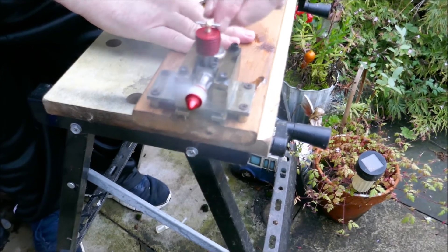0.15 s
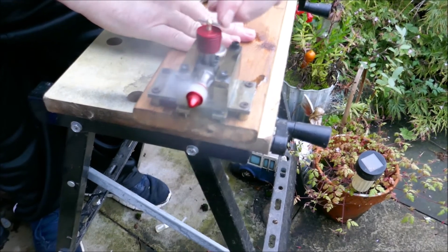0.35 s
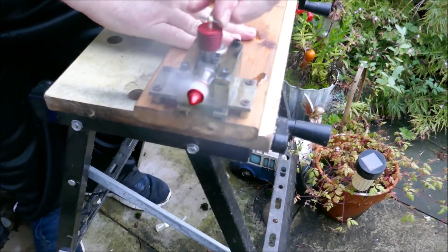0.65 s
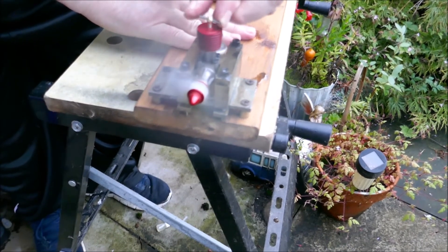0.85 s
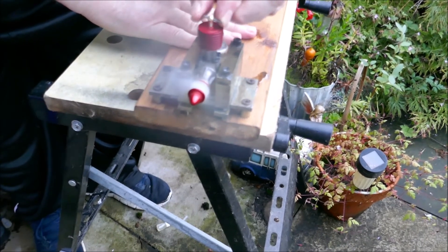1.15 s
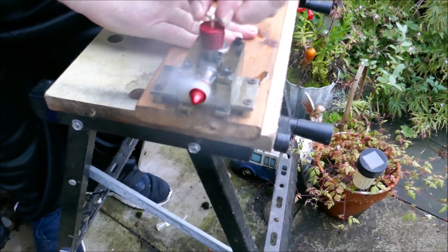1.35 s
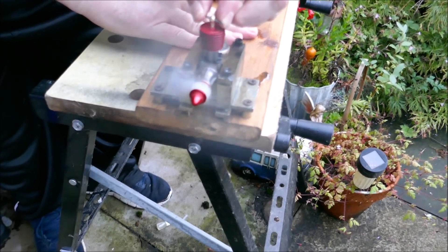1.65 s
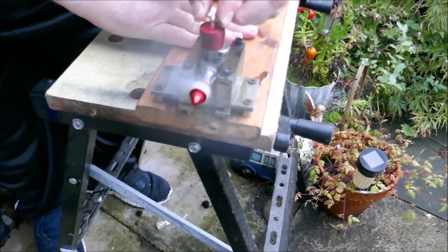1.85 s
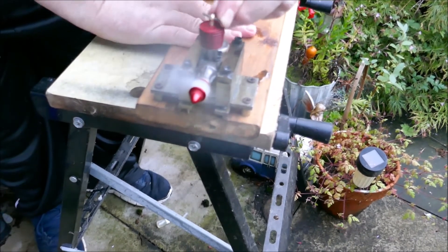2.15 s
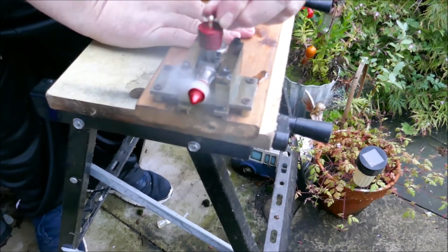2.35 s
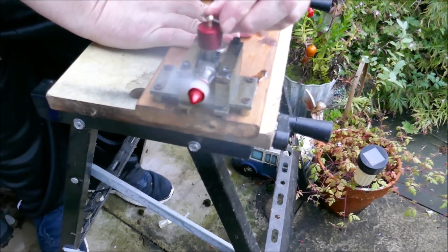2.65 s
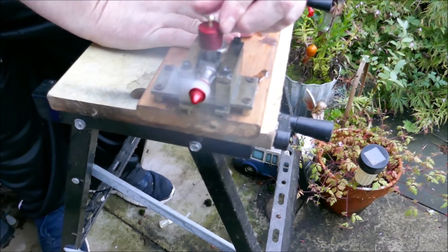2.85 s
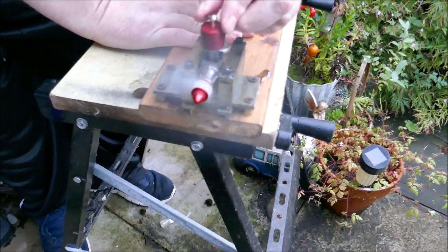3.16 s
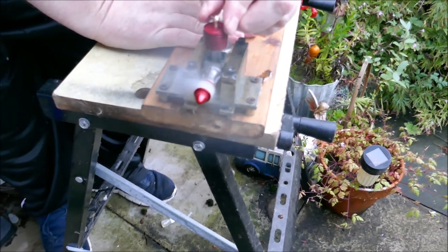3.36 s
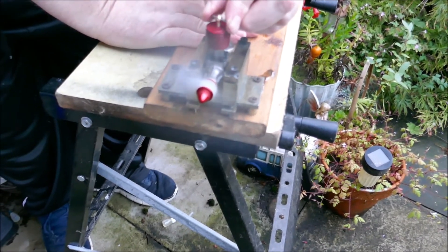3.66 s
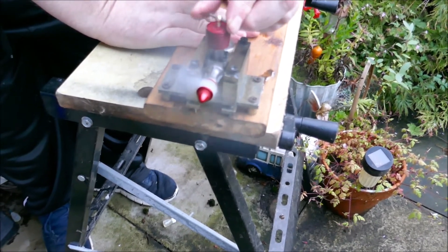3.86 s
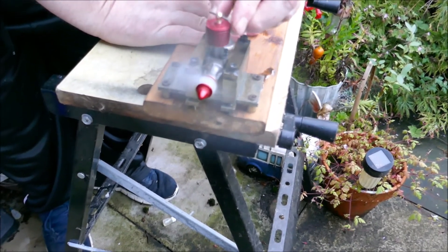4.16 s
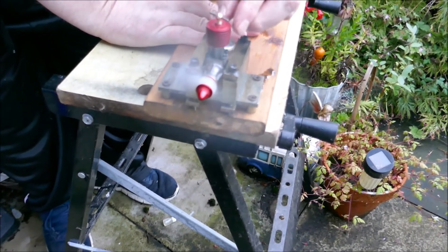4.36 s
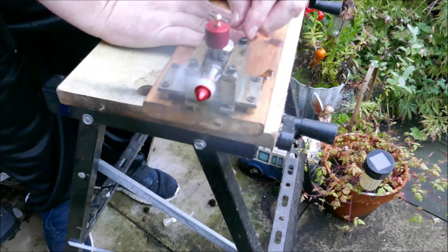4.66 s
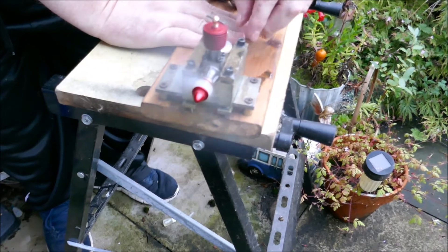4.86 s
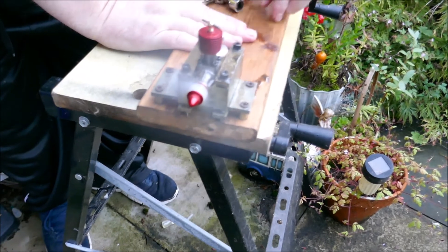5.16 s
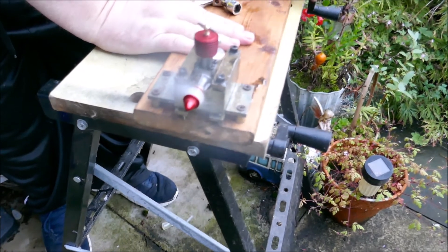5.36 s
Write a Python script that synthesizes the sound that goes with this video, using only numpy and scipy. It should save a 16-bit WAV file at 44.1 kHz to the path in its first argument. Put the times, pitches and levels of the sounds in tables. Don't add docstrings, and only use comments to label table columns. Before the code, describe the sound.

Continuous hard, nasal buzzing of a tiny propeller engine at full speed, with airy rush and faint hiss, its pitch wavering slightly.

```python
import sys
import numpy as np
from scipy import signal
from scipy.fft import rfft, irfft
from scipy.io import wavfile

SR = 44100
rng = np.random.default_rng(int(sys.argv[2]) if len(sys.argv) > 2 else 0)


def voltage_ratio(level):
    return 10 ** (np.asarray(level, float) / 20)


def generate_wav(sig):
    pcm = np.round(np.clip(np.atleast_2d(sig).T, -1, 1) * 32767).astype(np.int16)
    wavfile.write(sys.argv[1], SR, pcm)


N = 242550

# start_s, turns_per_s [1/s], bark_db [dB]
ENGINE_RUN = [(0.0, 115.5, -26.5), (0.49, 114.8, -26), (0.7, 115.3, -27), (1.36, 113.4, -26.5),
              (1.62, 114.0, -26.5), (2.45, 109.1, -26.5), (2.68, 109.8, -27), (3.02, 108.5, -26.5),
              (3.19, 108.8, -27), (3.37, 110.7, -27), (3.57, 111.0, -26), (3.77, 110.0, -27),
              (3.97, 110.9, -27), (4.04, 111.9, -26), (4.66, 112.6, -27), (4.86, 111.6, -26.5),
              (5.36, 113.3, -27), (5.5, 113.4, -26.5)]
# start_s, extra_path_ms, returned_share [signed, 0-1], treble_shading_db
HAND_MOVES = [
    (0, 0.95, -0.21, 0),
    (.8, 0.92, -0.13, 0.5),
    (1.8, 0.8, -0.026, -0.1),
    (2.3, 0.77, -0.03, 1),
    (3.2, 1, 0.039, -0.6),
    (3.5, 0.61, -0.003, 1),
    (4.0, 0.92, .09, 1.5),
    (4.7, 0.91, 0.15, -0.6),
    (5.5, 0.9, 0.23, -1.5),
]
# pitch_hz, width_hz, share [signed]
PORT_RINGS = [(1344, 1250, 0.5), (2554, 1104, -0.65), (3900, 1040, 0.12), (4832, 1250, -0.34)]
# delay_ms, left_share [signed], right_share [signed]
ECHO_PATHS = [(0.0, 0.82, 0.95), (0.86, 0.18, 0.078), (1.13, -0.0052, 0.38), (1.27, -0.11, -0.0032),
              (1.38, -0.098, -0.035), (1.75, -0.037, 0.018), (1.84, 0.072, 0.099), (2.43, 0.11, -0.092),
              (3.74, -0.064, 0.063), (4.54, -0.08, -0.27), (6.35, -0.19, -0.00043), (7.14, -0.071, -0.054),
              (8.1, -0.11, 0.0036), (8.37, 0.075, 0.12), (9.05, -0.073, -0.12), (9.59, -0.067, 0.12),
              (10.27, 0.12, -0.043), (11.18, -0.11, -0.19), (13.63, -0.24, 0.0089), (14.99, 0.28, -0.023),
              (17.6, -0.11, -0.1)]
# multiple [of turns per s], level_db [over blade tone], slope_db [per turn per s]
HUM_TONES = [(1, -30.5, -0.4), (3, -10, 0.2), (5, -6.5, 0.73), (6, -6.5, -0.87), (7, -7, 0.2)]
# multiple, level_db [far away], null_hz, width_hz, share_left [0-1]
CANCELLED_TONES = [(4, -51, 453, 17, 0.1), (8, -44, 907, 19.7, 0.057), (9, -37, 994, 51, .12)]
# place [turns], width [turns], level_db
GAS_PUFFS = [
    (.81, .065, -2.5),
    (.055, .04, 0.5),
    (.16, .11, -6),
]
# pitch_hz, level_db [per Hz]
RUSH_COLOUR = [(30, -34), (70, -18.5), (150, -11.5), (300, -11.5), (600, -5), (1200, -1), (2500, -2.5),
               (3300, -6.5), (5000, -10.5), (5700, -12), (6100, -28)]
# pitch_hz, level_db [per Hz]
HISS_COLOUR = [(4500, -7), (5500, -7), (6000, -9.5), (6500, -4.5), (7300, -8.5), (8700, -5), (10700, -8),
               (12200, -4.5), (13500, -8.5), (15000, -6.5), (17000, -13)]
# pitch_hz, likeness [0-1]
EAR_LIKENESS = [(30, .9), (60, .6), (90, .35), (130, .45), (220, .9), (2000, .93), (3000, .99), (4300, .99),
                (5000, .8), (9300, .65), (10300, .93), (16000, .94)]


def rms_one(x):
    return x / np.sqrt(np.mean(x ** 2) + 1e-20)


def in_time(rows):
    start_s, *columns = np.transpose(rows)
    return [np.interp(np.arange(N) / SR, start_s, column) for column in columns]


def at_hz(points, hz):
    pitch_hz, value = np.array(points)[:, 0], np.array(points)[:, 1]
    return np.interp(np.log(hz), np.log(pitch_hz), value)


def drift(per_s):
    r = np.exp(-40 * np.pi * per_s / SR)
    chance = rng.standard_normal(N // 20 + 2002)
    slow = signal.lfilter([1], [1, -2 * r, r * r], chance)[2000:]
    return np.interp(np.arange(N) / 20, np.arange(len(slow)), rms_one(slow))


def delayed(x, ms):
    return np.interp(np.arange(N) - ms * SR / 1000, np.arange(N), x, left=0)


def filtered(x, order, hz, kind="low"):
    return signal.sosfilt(signal.butter(order, hz, kind, fs=SR, output="sos"), x)


def filtered_in_place(x, hz, kind="low"):
    return signal.sosfiltfilt(signal.butter(2, hz, kind, fs=SR, output="sos"), x)


def duller(x, hz, share):
    low = filtered_in_place(x, hz)
    return low + share * (x - low)


def firings(turns, uneven_db, jitter_ms):
    at = np.interp(np.arange(1, int(turns[-1]) + 1), turns, np.arange(N))
    chance = rng.standard_normal((len(at), 2))
    at = np.clip(at + chance[:, 0] * jitter_ms * SR / 1000, 0, N - 2)
    whole = at.astype(int)
    part = at - whole
    size = voltage_ratio(uneven_db * chance[:, 1])
    pulses = np.zeros(N)
    pulses[whole] = size * (1 - part)
    pulses[whole + 1] = size * part
    return pulses


def exhaust(pulses):
    t = np.arange(256) / SR
    ring = 0
    for hz, width_hz, share in PORT_RINGS:
        ring = ring + share * t * np.exp(-np.pi * width_hz * t) * np.sin(2 * np.pi * hz * t)
    bark = signal.fftconvolve(pulses, ring)[:N]
    hz = np.arange(N // 2 + 1) * SR / N
    bark = irfft(rfft(bark) * np.clip((hz - 1050) / 30, 0, 1), N)
    return signal.sosfilt(signal.cheby1(8, .5, 5750, fs=SR, output="sos"), bark)


def hands(bark):
    path_ms, share, shade_db = in_time(HAND_MOVES)
    top = filtered(bark, 2, 3000, "high")
    return bark + (voltage_ratio(shade_db) - 1) * top + share * delayed(bark, path_ms)


def scattered(bark):
    t = np.arange(2048) / SR
    tail = rng.standard_normal((2, len(t))) * voltage_ratio(-60 * t / .09) * (t > .002)
    both, apart = filtered(tail, 2, 3300)
    stereo_tail = voltage_ratio(-34) * both + voltage_ratio(-38) * apart * [[1], [-1]]
    return signal.fftconvolve(bark[None], stereo_tail, axes=1)[:, :N]


def surroundings(bark):
    hollow_hz, hollow_width_hz, hollow_share = 1371, 37, 0.7
    far_ms, far_dull_hz, far_top_share = 3, 3100, 0.45
    ears_apart_hz, ears_top_share = 1180, 0.18
    top_apart_db, top_apart_hz, top_apart_ms = -18, 4240, 0.098
    b, a = signal.iirpeak(hollow_hz, hollow_hz / hollow_width_hz, fs=SR)
    bark = bark - hollow_share * signal.lfilter(b, a, bark)
    far = duller(bark, far_dull_hz, far_top_share)
    out = scattered(bark)
    for ms, left, right in ECHO_PATHS:
        source = far if ms > far_ms else bark
        out = out + delayed(source, ms) * np.array([[left], [right]])
    middle = out.mean(axis=0)
    side = duller((out[0] - out[1]) / 2, ears_apart_hz, ears_top_share)
    high = filtered(delayed(bark, top_apart_ms), 2, top_apart_hz, "high")
    side = side + voltage_ratio(top_apart_db) * high
    return (middle + side * [[1], [-1]]) * voltage_ratio([[.2], [-.2]])


def shaft_hum(turns, speed):
    blade_db = -40 - 0.17 * (speed - 112.5) ** 2
    peak_turn = .072
    bench_hz, bench_width_hz = 520, 110
    levels = [(2, voltage_ratio(blade_db))]
    for multiple, db, slope_db in HUM_TONES:
        levels.append((multiple, voltage_ratio(blade_db + db + slope_db * (speed - 113.5))))
    for multiple, db, null_hz, width_hz, left in CANCELLED_TONES:
        off = ((multiple * speed - null_hz) / width_hz) ** 2
        levels.append((multiple, voltage_ratio(db) * np.sqrt((off + left ** 2) / (off + 1))))
    tones = 0
    for multiple, gain in levels:
        shift = .6 * np.pi * np.exp(-((multiple * 112 - bench_hz) / bench_width_hz) ** 4)
        wave = multiple * 2 * np.pi * (turns - peak_turn) + shift
        tones = tones + gain * (np.cos(wave) + 0.089 * np.sin(wave) * [[1], [-1]])
    return -np.sqrt(2) * tones * voltage_ratio([[.35], [-.35]])


def crack(pulses):
    front = filtered(pulses, 2, [6500, 13500], "band")
    snap = delayed(front, .6) - .6 * delayed(front, .33)
    snap = snap + .35 * delayed(front, 1.15)
    snap = snap + .3 * delayed(front, 7.1) - .3 * delayed(front, 3.9)
    return rms_one(snap)


def gas_gate(turns, wander):
    place = turns + wander * drift(40)
    gate = .47
    for at, width, db in GAS_PUFFS:
        away = (place - at + .5) % 1 - .5
        gate = gate + voltage_ratio(db) * np.exp(-(away / width) ** 2)
    return gate


def air_noise(colour, patchy_db):
    hz = np.maximum(np.arange(N // 2 + 1) * SR / N, 1)
    alike = np.clip(at_hz(EAR_LIKENESS, hz), 0, 1)
    in_range = (hz > colour[0][0] / 2) * (hz < colour[-1][0])
    mid, side = rfft(rng.standard_normal((2, N)), axis=1) * voltage_ratio(at_hz(colour, hz)) * in_range
    pair = np.sqrt(1 + alike) * mid + np.sqrt(1 - alike) * side * [[1], [-1]]
    octave = np.log2(hz / 30)
    noise = 0
    for k in range(10):
        band = irfft(pair * np.maximum(1 - abs(octave - k), 0), N)
        noise = noise + band * voltage_ratio(patchy_db * drift(8.2))
    return rms_one(noise)


def propeller_rush(gate):
    return voltage_ratio(-45) * rms_one(gate ** .15 * air_noise(RUSH_COLOUR, patchy_db=1.2))


def port_hiss(gate, lower_db, upper_db):
    jet = rms_one(gate * air_noise(HISS_COLOUR, patchy_db=1.0))
    lower = filtered_in_place(jet, 7800)
    upper = filtered_in_place(jet, 9800, "high")
    middle = jet - lower - upper
    middle_db = (lower_db + upper_db) / 2 + 8
    return voltage_ratio(lower_db + 15.0) * lower + voltage_ratio(upper_db + 9.0) * upper + voltage_ratio(middle_db) * middle


def ports(pulses, gate):
    moves_per_s, hiss_sway_db, crack_sway_db = .8, .6, 1.5
    lower_db = -56 + hiss_sway_db * drift(moves_per_s)
    upper_db = -59.5 + hiss_sway_db * drift(moves_per_s)
    crack_db = -57.5 + crack_sway_db * drift(moves_per_s)
    sound = port_hiss(gate, lower_db, upper_db) + voltage_ratio(crack_db) * crack(pulses)
    finger_ms = .205 + .008 * drift(moves_per_s)
    return np.array([side + .2 * delayed(side, finger_ms) for side in sound])


def scene():
    speed, bark_db = in_time(ENGINE_RUN)
    first_turn = .654
    turns = first_turn + np.cumsum(speed * (1 + .00028 * drift(25))) / SR
    pulses = firings(turns, uneven_db=.35, jitter_ms=.004)
    bark = hands(exhaust(pulses))
    engine = voltage_ratio(bark_db) * rms_one(surroundings(bark))
    engine = engine + shaft_hum(turns, speed)
    surge = voltage_ratio(.3 * drift(4))
    gate = gas_gate(turns, wander=.015)
    return surge * engine + ports(pulses, gate) + propeller_rush(gate)


def top_cut(x):
    return signal.sosfilt(signal.butter(12, 16860, fs=SR, output="sos"), x)


def record(dry):
    cut_hz = 15950 - 240
    mix = signal.sosfilt(signal.ellip(10, .5, 70, cut_hz, fs=SR, output="sos"), dry)
    return top_cut(mix)


dry = scene()
out = record(dry)
generate_wav(out)
```